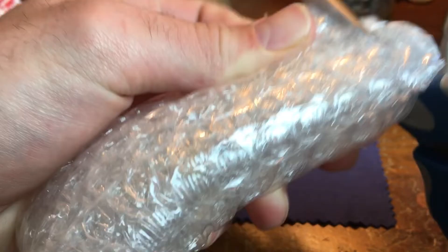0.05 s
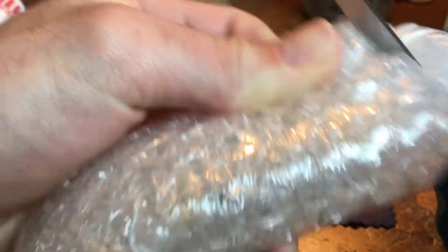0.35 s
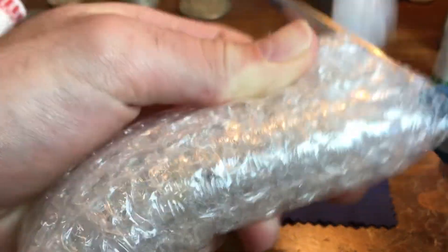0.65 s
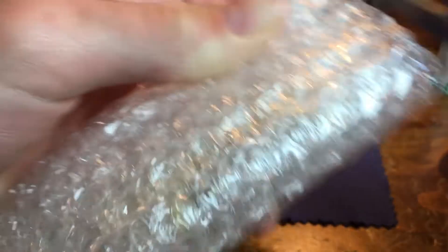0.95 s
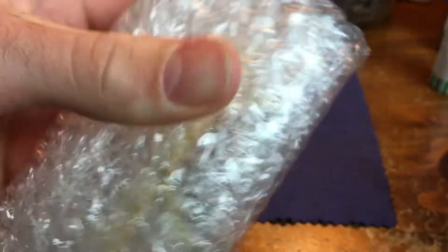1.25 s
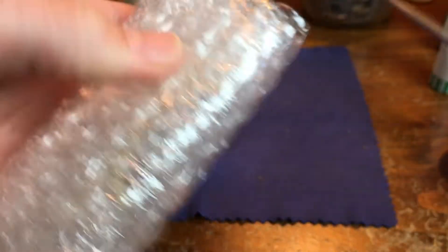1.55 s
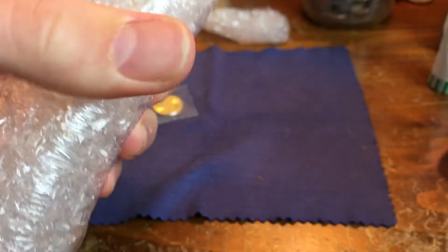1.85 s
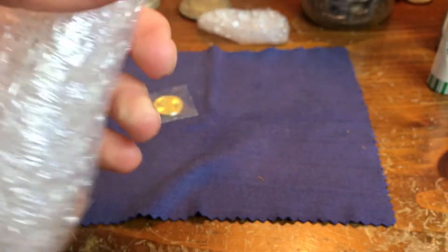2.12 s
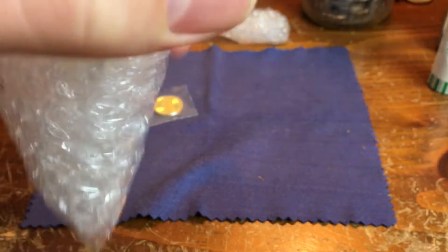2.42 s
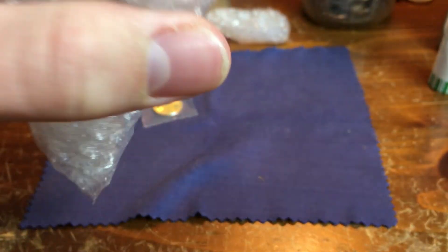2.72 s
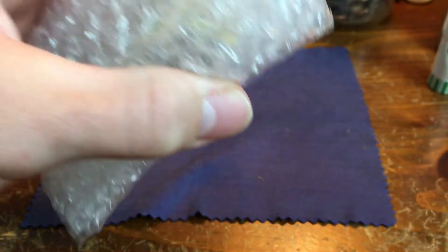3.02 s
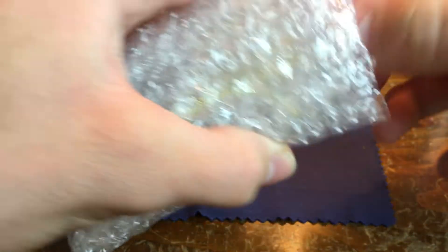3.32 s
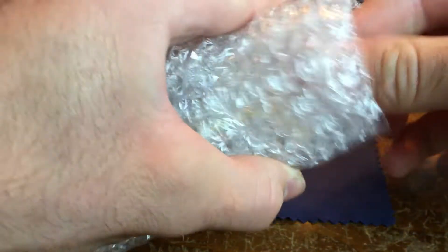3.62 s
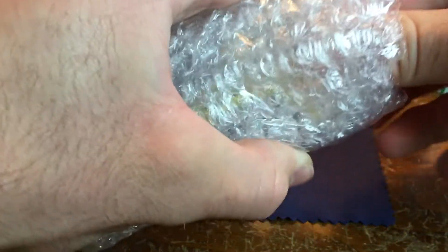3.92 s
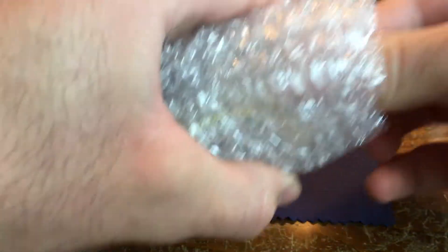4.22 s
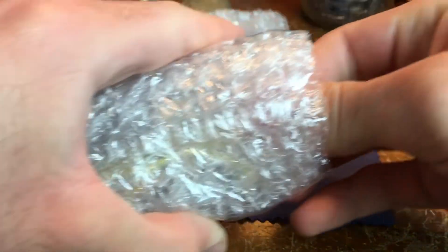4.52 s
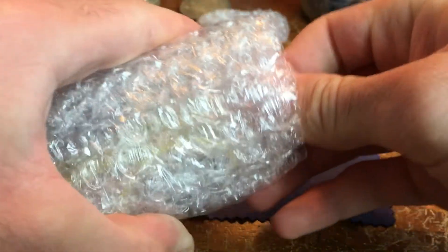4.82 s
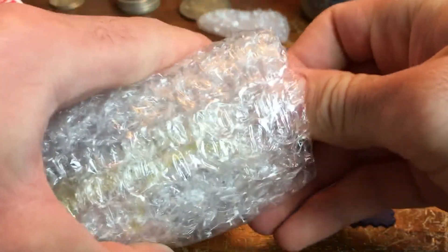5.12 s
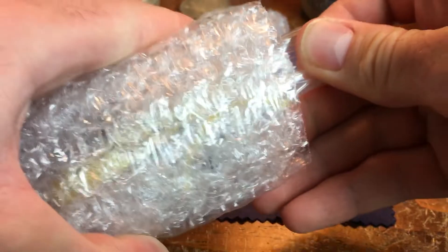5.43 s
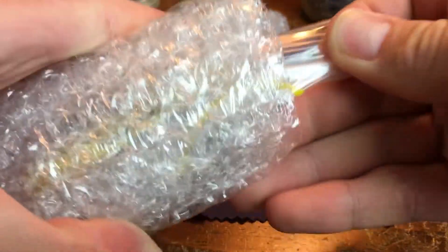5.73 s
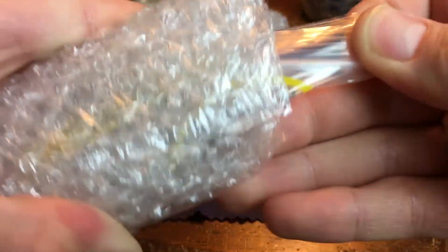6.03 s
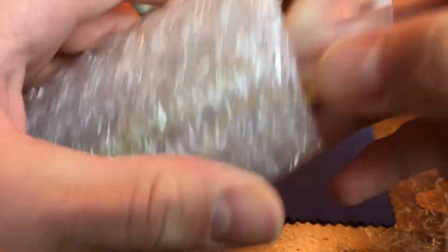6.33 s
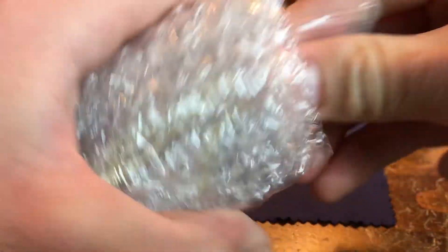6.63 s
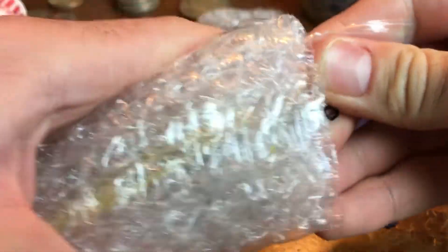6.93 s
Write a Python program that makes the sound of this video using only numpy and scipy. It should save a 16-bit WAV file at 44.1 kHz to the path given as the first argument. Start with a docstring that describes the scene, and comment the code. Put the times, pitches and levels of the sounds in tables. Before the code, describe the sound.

Close bubble wrap crinkling as scissors snip it, clack down on wood, and fingers work the plastic open in a quiet room.

```python
"""Bubble wrap, close up: hands open a small parcel in a quiet room.
Sliding film fizzes, folds crinkle and snap, and air cells give soft hollow bumps under the fingers.
Scissors snip through the wrap and are put down with a clack that rings the wooden table;
fingers then work a plastic sleeve out. Short reflections, dull air and a faint hum sit behind it."""
import sys
import numpy as np
from scipy import signal
from scipy.fft import rfft, irfft
from scipy.io import wavfile
from scipy.ndimage import uniform_filter1d, map_coordinates

SR = 44100
rng = np.random.default_rng(int(sys.argv[2]) if len(sys.argv) > 2 else 0)


def master(y):
    """Save y as 16-bit WAV."""
    cut = np.clip(np.atleast_2d(y).T, -1, 1)
    pcm = np.round(cut * 32767)  # scale
    wavfile.write(sys.argv[1], SR, pcm.astype(np.int16))


N = 315756
TIME = np.arange(N) / SR


def amp(db):
    """Decibels to gain."""
    return 10 ** (np.asarray(db) / 20)


def unit(x):
    """Scales to energy 1."""
    return x / np.sqrt(np.sum(x ** 2) + 1e-20)


def curve_at(points, hz):
    """Joins (frequency, value) points on a log-frequency axis."""
    point_hz, value = np.transpose(points)
    return np.interp(np.log(hz + 1), np.log(point_hz + 1), value)


def add(mix, start, sound):
    """Lays a sound into the mix at a start time in seconds."""
    part = mix[max(round(start * SR), 0):][:len(sound)]
    part += sound[:len(part)]


def colour(x, eq, tilt_db=0, size=1024):
    """Minimum-phase EQ, with an extra tilt per octave above 1500 Hz."""
    hz = abs(np.fft.fftfreq(size, 1 / SR))
    log_gain = np.log(amp(curve_at(eq, hz) + tilt_db * np.log2(np.maximum(hz / 1500, 1))))
    impulse = np.fft.ifft(np.exp(np.conj(signal.hilbert(log_gain)))).real
    return signal.fftconvolve(x, impulse)


def swell(t, rise):
    """Smooth envelope that peaks at the rise time and dies away."""
    u = t / rise
    return u ** 2 * np.exp(2 * (1 - u))


def wander(per_s):
    """Smooth random curve through per_s normal draws a second."""
    knots = rng.standard_normal(2048)
    return map_coordinates(knots, [TIME * per_s], order=3, mode="wrap")


def triggers(gain, per_s):
    """Random hits that follow an envelope: (time [s], envelope level [dB], two normal draws)."""
    at = np.flatnonzero(rng.random(N) < per_s / SR)
    return np.c_[TIME[at], 20 * np.log10(gain[at]), rng.standard_normal((N, 2))[at]]


# Crackle bed of the wrap creeping in the holding hand: (time [s], level [dB])
GRIP_BED = [(0.0, -57), (0.28, -66), (0.5, -58), (0.85, -54.5), (1.25, -62.5), (1.68, -64.5), (1.82, -70),
            (2.3, -72.5), (2.6, -62.5), (3.15, -63.5), (3.6, -54), (4.54, -58), (4.9, -55), (5.15, -59),
            (5.48, -63), (6.0, -57.5), (6.8, -51), (7.16, -48.5)]
# Finger strokes: (time [s], length [s], attack [s], slide level before sag [dB],
# bend [dB re slide], press [dB re slide])
FINGER_STROKES = [(0.056, 0.071, .008, -47, -25, -12), (0.116, 0.1, 0.049, -41, -6.5, -12.5),
                  (0.316, 0.09, 0.0052, -44, -11.5, -18), (0.528, 0.13, 0.067, -42.5, -10, -18),
                  (0.676, 0.11, .03, -49, -13, -24), (0.867, 0.27, .012, -54, -5, -8.5),
                  (1.294, 0.24, .02, -58.5, -9, -13), (1.605, 0.045, .015, -60, -7.5, -9),
                  (1.859, 0.15, 0.022, -59, -11.5, -10.5), (2.022, 0.053, .04, -53, -11, -8),
                  (2.32, 0.038, 0.049, -61, -6, -1), (2.78, 0.35, 0.0086, -59.5, -4.5, -18),
                  (3.172, 0.28, 0.043, -57, -4.5, -6.5), (3.339, 0.18, 0.15, -40.5, -5, -10),
                  (3.526, 0.042, .02, -47, -10, -12), (3.619, 0.06, 0.032, -44, -11, -12.5),
                  (3.744, 0.069, .03, -48.5, -11, -12), (3.84, 0.065, 0.024, -54.5, -14, -12),
                  (3.909, 0.028, .018, -42.5, -9.5, -15), (3.984, 0.11, .035, -48.5, -8, -8.5),
                  (4.114, 0.11, 0.018, -53, -4, -7.5), (4.274, 0.028, .015, -53, -1, -3),
                  (4.376, 0.13, .04, -54.5, -4, -4), (4.551, 0.074, 0.022, -53, -4.5, -8),
                  (4.724, 0.25, .03, -52.5, -8, -8.5), (5.022, 0.063, 0.026, -47.5, -2.5, -4.5),
                  (5.176, 0.17, .006, -48, 0.5, -1), (5.591, 0.16, 0.036, -51.5, -6.5, -8.5),
                  (5.824, 0.035, 0.012, -51, -6, -3.5), (5.903, 0.073, 0.033, -47, -7, -11.5),
                  (6.033, 0.21, 0.034, -49, -8.5, -8.5), (6.29, 0.041, .015, -57, -1, 2),
                  (6.39, 0.062, 0.021, -47, -8.5, -7), (6.502, 0.035, .015, -44, -9, -15),
                  (6.6, 0.2, 0.066, -47, -8, -9.5), (6.82, 0.11, 0.037, -42, -5, -8),
                  (6.952, 0.12, 0.031, -40.5, -7.5, -13.5), (7.094, 0.036, .012, -46.5, -5, -8)]


def handling(release_s=0.027, sag_db=2):
    """Slide, bend and press envelopes: each stroke takes hold, eases and lets go over the grip bed."""
    grip = amp(np.interp(TIME, *np.transpose(GRIP_BED)))
    power = (grip * amp([[0], [-7.5], [-11.5]])) ** 2  # slide, bend, press
    t = TIME[:SR]
    for start, length, rise, db, bend_db, press_db in FINGER_STROKES:
        attack = np.minimum(t / rise, 1)
        release = np.exp(-np.maximum(t - length, 0) / release_s)
        push = amp(db - sag_db * (t / length + 0.5)) * attack * release
        for layer, gain in zip(power, (1, amp(bend_db), amp(press_db))):
            add(layer, start, (gain * push) ** 2)
    return np.sqrt(power)


def slips(eq, per_s, decay_s, spread_db=2.8, facets=7):
    """Grain cloud of tiny slips in the film, mostly weak and a few strong, levelled to steady power."""
    strength = amp(spread_db * np.minimum(rng.exponential(1, N), 4.5))
    hits = strength * (rng.random(N) < per_s / SR)
    facet, out = rng.integers(0, facets, N), np.zeros(N)
    hz, db = np.transpose(eq)
    for k in range(facets):
        power = signal.lfilter([1], [1, -np.exp(-2 / (decay_s * SR))], (hits * (facet == k)) ** 2 + 1e-12)
        # each facet of the film radiates best in its own part of the spectrum
        facet_db = 5 * np.cos(2 * np.pi * (k / facets + np.arange(len(hz)) / 4))
        out += colour(np.sqrt(power) * rng.standard_normal(N), np.c_[hz, db + facet_db])[:N]
    mean_power = uniform_filter1d(uniform_filter1d(out ** 2, size=1500), size=1500)
    return out / np.sqrt(abs(mean_power) + 1e-12)


# EQs of bright sliding film, midrange folds and hollow rubbed cells: (frequency [Hz], gain [dB])
FIZZ_EQ = [(1500, -38), (3800, 0), (5500, -2), (7000, 0), (8500, 2.5), (10500, 1), (13000, 4), (15000, 0.5),
           (16500, -7)]
FOLD_EQ = [(700, -42), (1400, -2), (1900, 2.5), (2600, 0), (3300, 2), (4400, -2), (6000, -6.5),
           (10000, -23.5)]
CELL_EQ = [(100, -37.5), (300, -13.5), (500, 2.5), (700, 4), (900, 7.5), (1200, 2.5), (1450, -8.5),
           (2500, -15)]


def film_rustle(slide, bend, press):
    """Film sliding on film fizzes; bending folds crinkle lower; pressed cells rub with a hollow tone."""
    # the sheets catch and let go, so the slips come in clumps
    clumps = amp(2.02 * wander(per_s=130) + 1.29 * wander(per_s=45))
    fizz = slips(FIZZ_EQ, per_s=2800, decay_s=.001)
    folds = slips(FOLD_EQ, per_s=1300, decay_s=.0012)
    cells = slips(CELL_EQ, per_s=600, decay_s=.0012)
    return clumps * (slide * fizz + bend * folds + press * cells)


# EQ of the room's air: (frequency [Hz], gain [dB])
AIR_EQ = [(15, -26), (31, 4), (39, 6), (80, -8), (130, 0.5), (200, -6), (350, -2.5), (500, -1.5), (800, -6),
          (1300, -15), (3000, -18.5), (15000, -23.5)]
# Steady hum in the room: (frequency [Hz], rms level [dB])
HUM_TONES = [(120, -78), (240, -76.5), (303, -77.5), (480, -76.5)]


def room_tone():
    """A bed of dull air and faint hum."""
    hz = np.fft.rfftfreq(N, 1 / SR)
    spectrum = rfft(rng.standard_normal(N)) * amp(curve_at(AIR_EQ, hz))
    air = unit(irfft(spectrum, N)) * np.sqrt(N)
    hum = sum(amp(db) * np.sqrt(2) * np.sin(2 * np.pi * (f * TIME + rng.random())) for f, db in HUM_TONES)
    return amp(-63) * air + hum


# Featured snaps of film buckling or being cut:
# (time [s], rms level over 3 ms [dB], tilt [dB/octave], nominal length [s])
SNAP_CUES = [(0.096, -36.5, 4.5, 0.00087), (0.2496, -38.5, 13, 0.0005), (0.3255, -29.5, 6.5, 0.0022),
             (0.392, -39, -2, 0.0025), (0.4387, -34.5, 4, 0.00057), (0.625, -32.5, -2, 0.0014),
             (0.6273, -24.5, 3.5, 0.0059), (0.8803, -41, -2.5, 0.0007), (1.077, -31.5, 2.5, 0.0013),
             (1.65, -41, 13, 0.0005), (2.0813, -50.5, -2, 0.0015), (2.0905, -50, 2, 0.0017),
             (2.3621, -48.5, -2.5, 0.001), (3.271, -40.5, 0, 0.00066), (3.504, -40.5, -6, 0.00079),
             (3.5537, -40, 7, 0.00067), (3.6488, -35, 4, 0.00046), (3.9334, -41, 2, 0.0013),
             (4.21, -41, 4, 0.00063), (4.866, -41.5, 0, 0.00093), (4.965, -40, 7, 0.0007),
             (5.06, -41, 4, 0.0013), (5.1845, -36.5, -6, 0.00077), (5.19, -37.5, -4.5, 0.0017),
             (5.524, -44.5, -6, 0.0017), (5.618, -44, 2, 0.0007), (5.644, -38, 7, 0.001),
             (5.836, -42.5, 1.5, 0.00074), (6.1925, -41.5, -2.5, 0.00052), (6.2188, -47, 2, 0.001),
             (6.311, -40.5, -4, 0.0017), (6.728, -32.5, 8, 0.00051), (6.7522, -26.5, 3.5, 0.0013),
             (6.762, -36, 0, 0.00077), (6.8385, -36, 7.5, 0.00065), (6.8532, -41, -3, 0.0013),
             (6.8945, -39.5, -4, 0.00073), (6.9218, -29.5, 4, 0.00085), (6.9271, -36.5, 0, 0.00076),
             (7.0176, -36.5, 0.5, 0.00089)]
# EQ of a snap: (frequency [Hz], gain [dB])
SNAP_EQ = [(200, -9), (800, -3), (1450, -6), (2000, 3.5), (4000, 2), (6000, 1), (9000, 1.5), (14000, 4.5),
           (16500, -10.5)]


def film_snaps(slide, bend, over_db=5, spread_db=2.4, tilt_spread=2.4, length_s=0.00087):
    """A fold flips over in about a millisecond and leaves the sheet around it shivering."""
    out, t, noise = np.zeros(N), TIME[:1500], rng.choice([-1, 1], N + SR)
    tilts = -0.5 - 0.34 * 20 * np.log10(bend / slide)  # deep bending makes duller snaps
    fill = [(start, db + over_db + spread_db * accent,
             tilts[round(start * SR)] + tilt_spread * brightness, length_s)
            for start, db, accent, brightness in triggers(slide, per_s=18)]
    for start, db, tilt_db, length in SNAP_CUES + fill:
        flip = signal.windows.tukey(round(1.7 * length * SR), .6)
        envelope = amp(-14) * np.exp(-t / .007)  # the shivering tail
        add(envelope, 0, flip)
        burst = unit(colour(envelope * noise[round(start * SR):][:len(t)], SNAP_EQ, tilt_db))
        add(out, start, amp(db) * np.sqrt(.003 * SR) * burst)
    return out


# Featured nudges of air cells by finger or blade: (time [s], level [dB], pitch [Hz], nominal attack [s])
BUMP_CUES = [(0.326, -42.5, 540, 0.001), (0.6247, -22.5, 530, 0.00095), (0.6325, -33.5, 540, 0.002),
             (1.0802, -44, 890, 0.0013), (1.1643, -38.5, 710, 0.00087), (1.209, -46, 720, 0.00093),
             (2.0779, -40.5, 1400, 0.0006), (2.2211, -48, 1790, 0.00077), (2.3619, -47, 1000, 0.00073),
             (3.2001, -42, 830, 0.0015), (3.5045, -39.5, 940, 0.0011), (4.426, -39.5, 800, 0.0011),
             (4.5983, -38.5, 940, 0.0014), (5.0575, -35.5, 790, 0.0008), (5.184, -37, 1030, 0.001),
             (5.189, -33.5, 1110, 0.00089), (5.3289, -34, 895, 0.00091), (5.5253, -40, 770, 0.0014),
             (6.1922, -38.5, 940, 0.001), (6.2187, -34, 870, 0.0011), (6.3269, -35.5, 750, 0.0013),
             (6.341, -38.5, 520, 0.0033), (6.349, -42, 740, 0.0031), (6.5001, -35, 880, 0.00072),
             (6.6897, -43, 750, 0.0026), (6.8679, -39.5, 1070, 0.0044), (6.9205, -37, 870, 0.001),
             (7.1162, -42, 690, 0.002)]


def cell_bumps(press, over_db=12.5, spread_db=2, cell_hz=830, spread_octaves=.22, rise_s=0.00073):
    """The air in a cell rings for a few cycles, under a finger scuff coloured by the same cell."""
    out, t, noise = np.zeros(N), TIME[:2000], rng.standard_normal(N + SR)
    fill = [(start, db + over_db + spread_db * accent, cell_hz * 2 ** (spread_octaves * detune), rise_s)
            for start, db, accent, detune in triggers(press, per_s=8)]
    for start, db, hz, rise in BUMP_CUES + fill:
        ring = swell(t, .7 * rise) * np.sin(2 * np.pi * hz * t)
        gain = amp(db) * (.001 / rise) ** .15  # a slow push rings the cell less
        rub = swell(t, 1.5 * rise) * noise[round(start * SR):][:len(t)]
        tuned_eq = np.multiply(CELL_EQ, [hz / cell_hz, 1])
        scuff = unit(colour(rub, tuned_eq)[:len(t)]) * np.linalg.norm(ring)
        add(out, start, gain * (ring + .8 * scuff))
    return out


# The scissors touch the table, then land: (time [s], force [dB], low-pass cutoff [Hz])
SCISSOR_HITS = [(2.4336, -17.5, 12000), (2.4348, -17.5, 9000), (2.4397, -13, 450), (2.4494, -2, 4540),
                (2.4606, -18.5, 3000)]
# Ring of the table with the scissors on it: (frequency [Hz], level [dB], 60 dB decay [s])
TABLE_MODES = [(93, -40, 0.031), (163, -31.5, 0.062), (243, -52, 0.2), (309.4, -36, 0.17),
               (451, -25, 0.043), (470, -38, 0.26), (526, -42, 0.21), (669, -36.5, 0.17), (850, -40, .17),
               (930, -41, 0.2), (943, -7.5, 0.013), (1033, -40, .17), (1200, -43, 0.18), (1560, -43, 0.22),
               (1670, -49, .17), (2130, -22.5, 0.021), (2256, -50, .19), (2520, -41, 0.15),
               (2930, -27, 0.018), (3250, -46, .15), (3780, -26.5, 0.015)]
# EQ of the clack: (frequency [Hz], gain [dB])
CLACK_EQ = [(50, -13), (200, -3.5), (450, 1.5), (700, 5.5), (950, -7), (1350, -5), (1650, 4.5),
            (2400, -4.5), (4000, -7), (6500, -14), (15000, -8.5)]


def scissors_on_table():
    """Each contact gives a short clack of metal on wood and rings the table, dulled by its own low-pass cutoff."""
    out, t = np.zeros(N), TIME[:SR // 2]
    ring = sum(amp(db - 60 * t / t60) * np.cos(2 * np.pi * hz * t) for hz, db, t60 in TABLE_MODES)
    attack = 1 - np.exp(-t / .0004)
    for start, db, cutoff_hz in SCISSOR_HITS:
        chatter = rng.standard_normal(len(t)) * (np.exp(-t / 0.0036) + amp(-19) * np.exp(-t / 0.055))
        clack = amp(.5) * unit(colour(chatter, CLACK_EQ)[:len(t)])
        hit = signal.lfilter(*signal.butter(1, cutoff_hz, fs=SR), attack * (ring + clack))
        add(out, start, amp(db) * hit)
    return out


# Reverb time of the small room: (frequency [Hz], 60 dB decay [s])
ROOM_DECAY = [(100, 0.065), (500, 0.21), (1500, 0.24), (4000, 0.19), (9000, 0.15), (16000, 0.26)]


def reflections(send, patterns=3, predelay_s=.003, crossfade_hz=5):
    """Dense reflections from the table top and near walls; their pattern shifts as the hands move."""
    t, out = TIME[:SR // 2], np.zeros(N)
    for k in range(patterns):
        taps = rng.standard_normal(len(t)) * (rng.random(len(t)) < .15) * (t > predelay_s)
        hz, age, spectra = signal.stft(taps, SR, nperseg=256)
        decay = amp(-60 * age / curve_at(ROOM_DECAY, hz)[:, None])
        tail = signal.istft(spectra * decay, SR, nperseg=256)[1]
        share = np.sqrt(2 / patterns) * np.cos(np.pi * (2 * crossfade_hz * TIME + k / patterns))
        out += signal.oaconvolve(send * share, unit(tail))[:N]
    return out


def scene():
    """Mono mix: wrap and scissors up front, a small room behind."""
    slide, bend, press = handling()
    rustle = film_rustle(slide, bend, press)
    accents = film_snaps(slide, bend) + cell_bumps(press)
    knock = scissors_on_table()
    wet = reflections(amp(-7) * rustle + amp(-6.5) * accents + amp(-5.5) * knock)
    return (rustle + accents + knock + wet + room_tone())[None]


def record(dry):
    """A steep low-pass trims the very top of the mix."""
    lowpass = signal.firwin(301, cutoff=16050, window=("kaiser", 8), fs=SR)
    return signal.oaconvolve(dry, lowpass[None], "same")


dry = scene()
out = record(dry)
master(out)
```